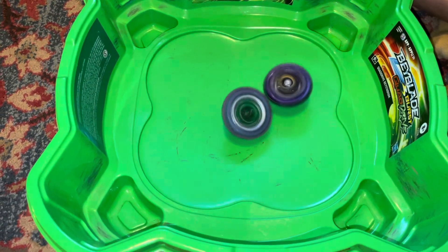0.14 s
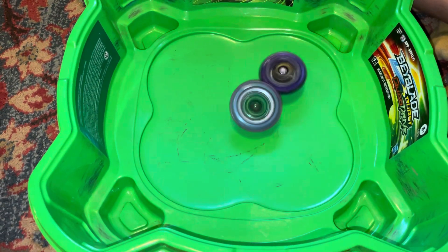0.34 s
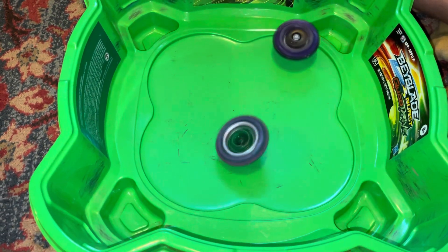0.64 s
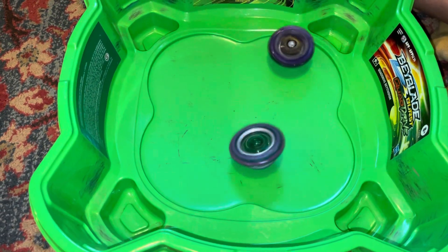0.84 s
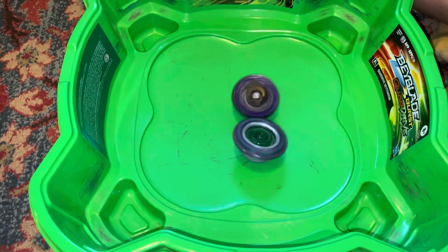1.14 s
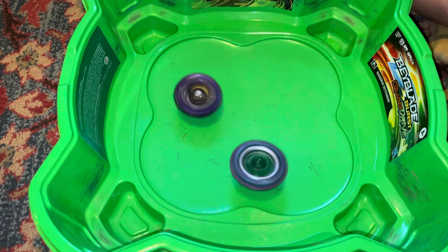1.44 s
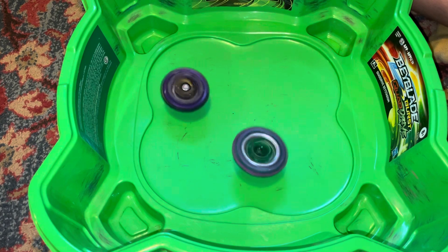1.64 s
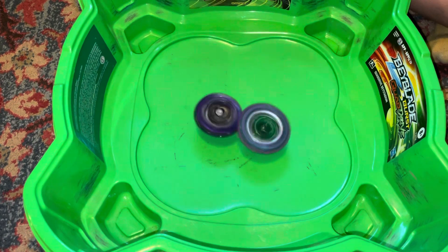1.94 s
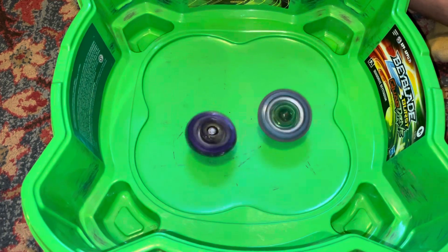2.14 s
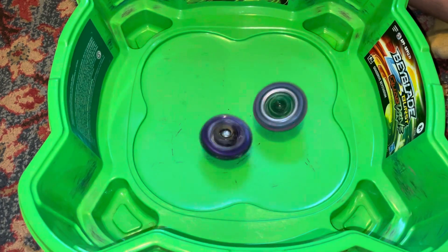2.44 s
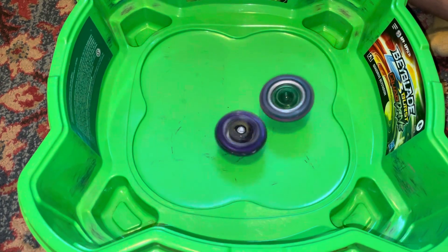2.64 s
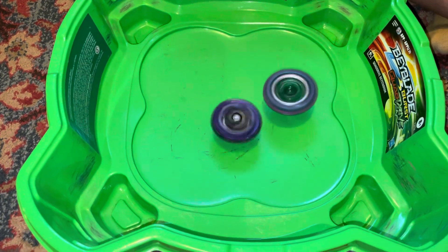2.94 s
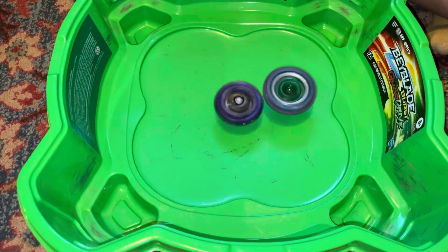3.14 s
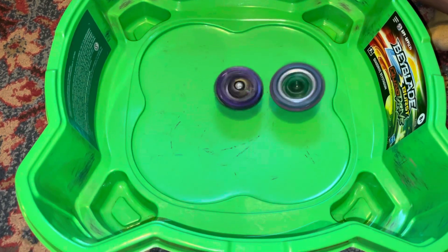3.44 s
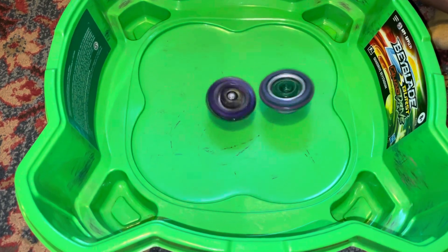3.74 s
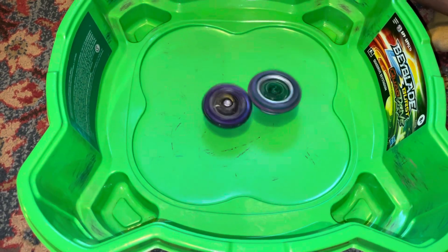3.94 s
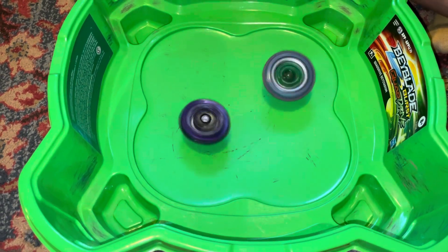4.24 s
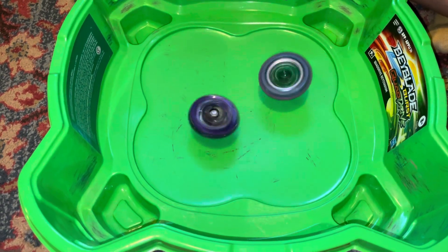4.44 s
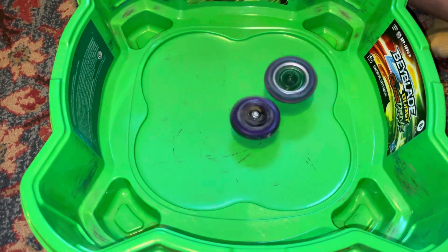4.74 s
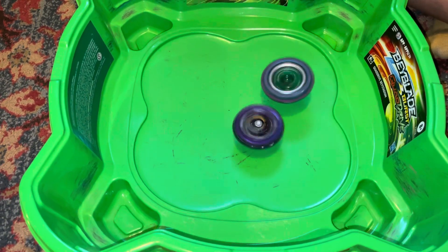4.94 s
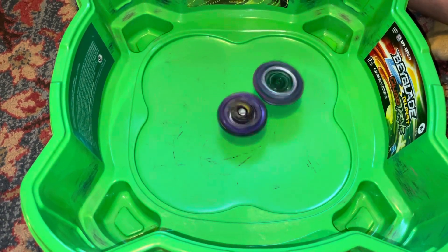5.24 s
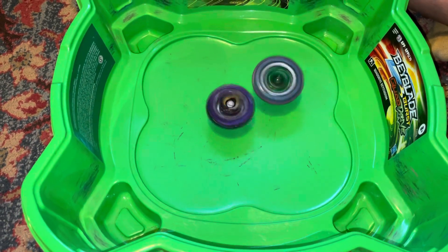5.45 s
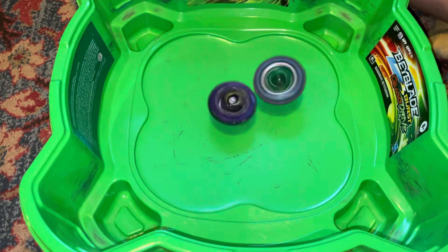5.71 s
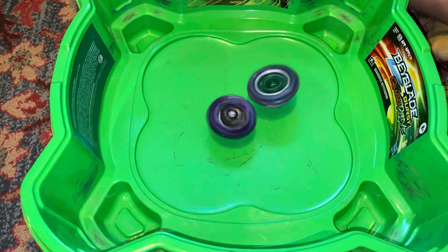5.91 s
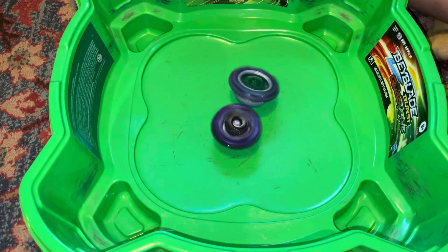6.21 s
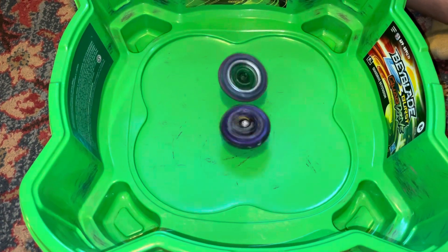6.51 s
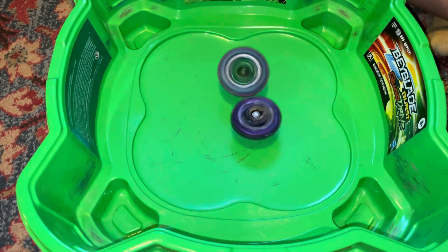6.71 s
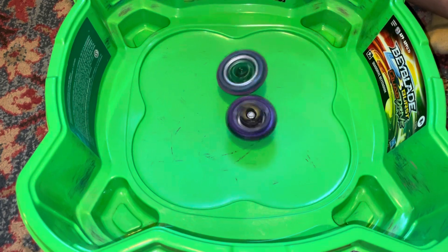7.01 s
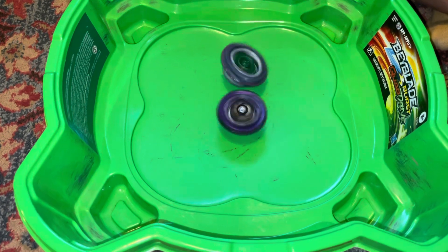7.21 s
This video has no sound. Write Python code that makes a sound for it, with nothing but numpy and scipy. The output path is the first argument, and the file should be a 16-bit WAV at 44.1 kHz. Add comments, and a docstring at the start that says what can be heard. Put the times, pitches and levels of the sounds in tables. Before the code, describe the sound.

Sharp plastic-and-metal clacks burst unevenly as two spinning tops meet, separate and meet again. Between hits, tilted tips patter quickly and roll with a faint rough whirr and rumble. The thin bowl resonates briefly, with soft thuds below. Heard close, in near-centred stereo with short room reflections and a steady low hum; a dense cluster of clashes comes at the end.

```python
"""In a thin plastic arena on a rug, two toy spinning tops with metal rings clash, heard from close above.
Rims grind in short bursts of gritty noise that excite broad body resonances and narrow shell modes.
Tilted tips knock on the floor about once a turn, and rolling tips whirr and rumble as shaped noise.
Some clashes leave a ring singing in throbbing damped partials, and the shell booms.
A faint appliance hum of narrow noise bands fills the room, whose reflections are decaying noise."""
import sys
import numpy as np
from scipy import signal
from scipy.fft import rfft, irfft, next_fast_len
from scipy.io import wavfile
from scipy.ndimage import uniform_filter1d

SR = 44100
rng = np.random.default_rng(int(sys.argv[2]) if len(sys.argv) > 2 else 0)


def wrap_up_sound(samples):
    """Save the sound to the file named by the first command line argument, as 16-bit audio."""
    columns = np.atleast_2d(samples).T
    # keep every value between -1 and 1, then stretch to whole-number steps
    tamed = np.clip(columns, -1, 1)
    steps = np.round(tamed * 32767).astype(np.int16)
    wavfile.write(sys.argv[1], SR, steps)


N = 325084


def from_db(db):
    """Decibel law: amplitude gain of a level in dB."""
    return 10 ** (np.asarray(db) / 20)


def rms_one(x):
    """Normalisation of effective value: x scaled to rms 1."""
    return x / np.sqrt(np.mean(x ** 2) + 1e-20)


def at_hz(points, hz):
    """Logarithmic pitch: the table's second column read on a log-frequency axis."""
    table_hz, value = np.transpose(points)
    return np.interp(np.log(hz + 1), np.log(table_hz), value)


def drift(rate):
    """Random modulation: straight lines between normal deviates, `rate` of them per second."""
    knots = rng.standard_normal(2000)
    return np.interp(np.arange(N) / SR * rate, np.arange(len(knots)), knots)


def coloured(spectrum, shape):
    """Spectral shaping: steady white noise weighted by a spectrum, rms 1."""
    white = rfft(rng.standard_normal(shape))
    weight = from_db(at_hz(spectrum, np.fft.rfftfreq(N, 1 / SR)))
    return rms_one(irfft(white * weight, N))


def resonate(x, hz, width):
    """Damped resonance: a two-pole band-pass with gain 1 on top."""
    r = np.exp(-np.pi * width / SR)
    numerator = [(1 - r * r) / 2, 0, (r * r - 1) / 2]
    denominator = [1, -2 * r * np.cos(2 * np.pi * hz / SR), r * r]
    return signal.lfilter(numerator, denominator, x)


def bursts(times, level_db, fade_ms, rise_ms):
    """Transient contact: a quick rise and an exponential fade of force at each time."""
    out = np.full(N, 1e-12)
    ms = np.arange(SR // 10) * 1000 / SR
    for s, gain, fade in zip(times, from_db(level_db), np.broadcast_to(fade_ms, len(times))):
        i = round(s * SR)
        push = gain * (1 - np.exp(-ms / rise_ms)) * np.exp(-ms / max(fade, .3))
        out[i:i + len(ms)] += push[:N - i]
    return out


def grit(spread_db):
    """Rough contact: noise whose samples differ widely in size, as uneven micro-contacts do."""
    return rms_one(rng.standard_normal(N) * from_db(spread_db * rng.standard_normal(N)))


def struck(modes, times, level_db, scatter_db):
    """Modal excitation: every blow sets each mode ringing with a strength and sign of its own."""
    out = np.zeros(N)
    at = np.round(np.asarray(times) * SR).astype(int)
    chance = rng.standard_normal((len(at), len(modes), 2))
    for k, (hz, mode_db, t60) in enumerate(modes):
        clicks = np.full(N, 1e-18)
        strength = from_db(level_db + mode_db + scatter_db * chance[:, k, 0])
        np.add.at(clicks, at, strength * np.sign(chance[:, k, 1]))
        r, w = from_db(-60 / (t60 * SR)), 2 * np.pi * hz / SR
        out += signal.lfilter([0, np.sin(w)], [1, -2 * r * np.cos(w), r * r], clicks)
    return out


def smear(x, ms):
    """Finite contact time: a soft blow pushes for some ms, which weakens its treble."""
    push = np.hanning(round(ms * SR / 1000))
    return signal.fftconvolve(x, push / push.sum())[:N]


def tones(times, hz, level_db, rise_ms, t60):
    """Free damped vibration: one decaying sinusoid for each blow, swelling over some ms."""
    out, t = np.zeros(N), np.arange(SR // 3) / SR
    shape = (1 - np.exp(-1000 * t / rise_ms)) * from_db(-60 * t / t60)
    for s, pitch, gain in zip(times, hz, from_db(level_db)):
        i = round(s * SR)
        out[i:i + len(t)] += (gain * shape * np.sin(2 * np.pi * pitch * t))[:N - i]
    return out


# appliance hum bands: f/Hz, width/Hz, level/dB
HUM_BANDS = [(85.8, 4.6, -51.5), (121.4, 0.97, -52), (166.8, 5.6, -58.5), (241.8, 4.6, -63.5)]


def hum():
    """Narrow-band noise: sharply filtered noise is heard as wavering low tones of an appliance."""
    return sum(from_db(db) * rms_one(resonate(rng.standard_normal(N), hz, width))
               for hz, width, db in HUM_BANDS)


# modes of the arena's wall and floor: f/Hz, relative level/dB, t60/s
SHELL_MODES = [(393, -13.5, 0.024), (630, -8.5, 0.0086), (702, -1, 0.016), (766.7, -2.5, 0.025),
               (847, -3, 0.019), (918, -3, 0.024), (1077.4, -3, 0.036), (1208.5, -2.5, 0.044),
               (1292, -8.5, 0.0076)]


def shell(force):
    """Forced vibration: a continuous contact force drives the arena's modes."""
    return sum((-1) ** k * from_db(db) * resonate(force, hz, np.log(1000) / np.pi / t60)
               for k, (hz, db, t60) in enumerate(SHELL_MODES))


# broad resonances of the tops' plastic bodies: f/Hz, width/Hz, relative level/dB
BODY_RESONANCES = [(2227, 1030, 0.5), (2736, 587, 4.5), (3953, 510, -2), (4740, 920, 0.5), (6890, 1950, 0),
                   (9680, 1040, -3), (11500, 3200, -9.5), (15500, 1900, -34)]
TREBLE_SHORTENS = 0.057  # contact length falls with this power of the resonance's pitch


def bodies(force, times, level_db, fade_ms, rise_ms, scatter_db):
    """Source and resonator: each contact excites the plastic in another balance; higher is shorter."""
    balance = scatter_db * rng.standard_normal((len(times), len(BODY_RESONANCES)))
    out = np.zeros(N)
    for k, (hz, width, db) in enumerate(BODY_RESONANCES):
        fade = fade_ms * (hz / 5000) ** -TREBLE_SHORTENS
        contact = force * bursts(times, level_db + db + balance[:, k], fade, rise_ms)
        out += (-1) ** k * resonate(contact, hz, width)
    return out


def chatter(level, sparse_db):
    """Random impacts: scattered tiny contacts of loose parts and floor texture in bodies and shell."""
    force = level * grit(sparse_db)
    plastic = sum((-1) ** k * from_db(db) * resonate(force, hz, width)
                  for k, (hz, width, db) in enumerate(BODY_RESONANCES))
    return plastic + from_db(3.5) * shell(force)


# levels of the rolling tips before modulation: t/s, rumble level/dB, whirr level/dB
ROLLING_LEVELS = [(0.0, -43, -44), (0.16, -38.5, -49.5), (0.25, -32.5, -42.5), (0.4, -44, -48),
                  (0.6, -43, -45.5), (1.11, -44.5, -43.5), (1.39, -51, -53), (1.85, -47.5, -55),
                  (2.11, -49, -50), (3.05, -47.5, -53.5), (3.3, -39.5, -50.5), (3.51, -51, -57.5),
                  (4.04, -43.5, -45), (4.35, -54.5, -53), (5.29, -47, -50.5), (6.57, -49, -54.5),
                  (7.1, -53.5, -51), (7.37, -52, -47.5)]
# spectrum of the whirr: f/Hz, relative level per Hz/dB
WHIRR_SPECTRUM = [(110, -28), (180, 7.5), (201, -15.5), (239, -3.5), (361, -4.5), (496, -3.5), (839, -1),
                  (2150, -12), (2360, -10.5), (5000, -23), (8140, -32), (13000, -57), (16000, -80.5)]
# spectrum of the rumble: f/Hz, relative level per Hz/dB
RUMBLE_SPECTRUM = [(21, -44), (35, -6), (86, -7.5), (147, -4.5), (194, -25.5), (260, -24), (340, -80),
                   (570, -120)]


def rolling():
    """Roughness excitation: tips on textured floor give a flickering, grainy whirr and lumpy rumble."""
    s, rumble_db, whirr_db = np.transpose(ROLLING_LEVELS)
    now = np.arange(N) / SR
    whirr_now_db = np.interp(now, s, whirr_db)
    whirr = coloured(WHIRR_SPECTRUM, N) * from_db(whirr_now_db + 2.5 * drift(40.0) + 2 * drift(9.0))
    whirr += chatter(from_db(whirr_now_db - 8.5 + 6 * drift(60)), sparse_db=9.0)
    rumble_now_db = np.interp(now, s, rumble_db) + 3.5 * drift(12)
    return whirr, coloured(RUMBLE_SPECTRUM, N) * from_db(rumble_now_db)


# single knocks, bounces and some lesser clashes, all played as knocks:
# t/s, relative tick level/dB, relative shell level/dB
SINGLE_KNOCKS = [(0.0142, -26.5, -49), (1.6473, -36.5, -42), (1.8974, -25, -54), (2.6601, -32.5, -34.5),
                 (2.831, -29, -32.5), (2.876, -26.5, -62), (3.457, -34, -37), (3.4902, -32.5, -39.5),
                 (3.6279, -34.5, -37.5), (3.676, -29.5, -43), (3.799, -39, -50), (3.91, -15.5, -26),
                 (3.9337, -25, -28), (4.1115, -40, -35), (5.0606, -33.5, -52), (5.83, -34.5, -33.5),
                 (6.2356, -16.5, -26.5), (6.2679, -26, -32), (6.2972, -28, -31.5), (6.3566, -34, -33),
                 (6.436, -35, -40.5), (6.4883, -36.5, -43.5), (6.549, -34, -33.5), (6.868, -40, -42),
                 (5.5419, -47, -41), (5.946, -52, -39), (6.9531, -36.5, -40), (7.2818, -23.5, -24.5),
                 (0.326, -16, -21), (0.397, -35, -39), (2.799, -21, -33), (4.537, -45, -43),
                 (4.649, -34, -28), (4.751, -15.5, -30.5), (5.178, -18, -27), (5.289, -16, -23),
                 (7.227, -19, -29), (7.208, -12, -30), (7.342, -35.5, -35)]
# the shell rocking on the rug: f/Hz, relative level/dB, t60/s
BOOM_MODES = [(62, -8.5, 0.67), (81.2, 1, 0.28), (106.3, -10, 0.22), (147.5, 4, 0.089), (233, 1.5, 0.04),
              (344, 1.5, 0.016)]


def knocks():
    """Soft impact: a longer contact gives a duller tick, and its push on the floor rocks the shell."""
    s, tick_db, shell_db = np.hstack([np.transpose(SINGLE_KNOCKS), wobble_knocks()])
    tick = bodies(grit(1.4), s, tick_db + 7.5, fade_ms=3.47, rise_ms=3.2, scatter_db=2.0)
    tick = signal.sosfilt(signal.butter(1, 5000.0, fs=SR, output="sos"), tick)
    # a loose part in the top answers each knock a moment later with two short pings
    for late, pitch, size in rng.standard_normal((len(s), 2, 3)).transpose(1, 2, 0):
        ping_s, ping_hz = s + .002 + .012 * np.abs(late), 2700 + 110 * pitch
        tick += tones(ping_s, ping_hz, tick_db - 10.5 + 2.5 * size, rise_ms=1, t60=.02)
    # the tip skids on after the knock in a run of tiny contacts
    skid = bursts(s, tick_db - 13.5, fade_ms=14.9, rise_ms=12.0) * from_db(2.94 * drift(220.0))
    tick += chatter(skid, sparse_db=14.0)
    wall = shell(grit(8.8) * bursts(s, shell_db + 22, fade_ms=3.67, rise_ms=0.58))
    wall += smear(struck(SHELL_MODES, s + 0.00154, shell_db - 7.0, scatter_db=2.0), ms=0.36)
    boom = smear(struck(BOOM_MODES, s + 0.0082, shell_db - 10, scatter_db=-1.0), ms=5.23)
    return tick + wall, boom


# metal rings left singing by clashes:
# t/s, ring index, relative level of low partials/dB, relative level of upper partials/dB
SINGING_RINGS = [(0.1, 0, -36, -26), (.383, 0, -21, -17.5), (1.246, 0, -27, -43), (1.959, 0, -26, -25),
                 (2.513, 1, -42, -25), (2.579, 1, -34, -23), (3.054, 0, -25, -48), (3.128, 0, -34, -38),
                 (3.998, 0, -23, -22), (3.997, 1, -26.5, -46), (4.636, 1, -35, -30), (5.264, 1, -34, -35),
                 (5.347, 0, -30.5, -55), (6.211, 1, -37, -34), (7.058, 0, -30, -42), (7.246, 0, -26, -38),
                 (7.247, 1, -30, -31.5), (1.96, 1, -30, -51), (5.348, 1, -36, -41)]
# partials of each metal ring: f/Hz, relative level/dB, t60/s, lobes passing per turn
RING_MODES = [
    [(4920, -6, .28, 4), (10110, 0, .1, 4), (11945, -10, .3, 4), (12900, -16, .13, 4)],
    [(4605, -2, .33, 2), (4690, -7, .2, 2), (10210, 0, .12, 4)],
]
# rotation of the tops, also pacing the wobble knocks: t/s, rotation f/Hz
SPIN_RATE = [(0, 29), (2.3, 25), (4.3, 22), (7.4, 17)]


def rings():
    """Rotating mode shapes: lobes of struck partials turn with the top, so they throb and break up."""
    s, ring, low_db, upper_db = np.transpose(SINGING_RINGS)
    turns = np.cumsum(np.interp(np.arange(N) / SR, *np.transpose(SPIN_RATE))) / SR
    out = np.zeros(N)
    for k, partials in enumerate(RING_MODES):
        hit = np.round(ring) == k
        for hz, db, t60, lobes in partials:
            lobe = 1 + .45 * np.cos(2 * np.pi * (lobes * turns + rng.random()))
            throb = lobe * (.55 + .6 * drift(220))
            level_db = db + (upper_db if hz > 6000 else low_db)[hit]
            out += throb * tones(s[hit], np.full(hit.sum(), hz), level_db, rise_ms=2.5, t60=t60)
    return out


# rim on rim; the tones shift with the place of the blow: t/s, relative crack level/dB,
# relative shell level/dB, relative boom level/dB, basic grind fade/ms, shell tone f/Hz, boom tone f/Hz
RIM_CLASHES = [(0.101, -7, -23, -55, 2.16, 1146, 143), (0.314, -15.5, -20, -29.5, 8.4, 1040, 59.4),
               (0.3399, -8, -17, -49, 2, 808, 62), (0.3809, -7.5, -20.5, -25, 4.7, 787, 77),
               (1.1329, -18.5, -15, -53, 7.6, 1060, 146), (1.1388, -3, -22.5, -34.5, 2.2, 1036, 144),
               (1.245, -4.5, -18, -30, 3.1, 1015, 74), (1.936, -15, -24.5, -29, 6.7, 670, 88),
               (1.9587, -1, -11, -23.5, 1.67, 1000, 85), (2.0087, -20, -20, -30, 1.4, 990, 95.5),
               (2.51, -9, -17.5, -35, 4.2, 863, 80.4), (2.5778, -8, -15.5, -41, 3.4, 837, 80.5),
               (2.7722, -8, -17, -36.5, 3.4, 895, 81.4), (3.0469, -8, -25.5, -59, 1.06, 980, 129),
               (3.052, -9.5, -14, -33, 2, 978, 135), (3.1185, -10.5, -22, -25, 1.14, 1090, 100),
               (3.1263, -18, -22, -25.5, 5.9, 1020, 105), (3.1445, -17, -21.5, -25.5, 1.2, 1060, 101),
               (3.1989, -11, -17.5, -28.5, 3.2, 1020, 108.5), (3.3665, -10, -19.5, -38, 2.37, 1075, 76.6),
               (3.8556, -18.5, -27, -37, 2.2, 1470, 143), (3.877, -13, -16, -28.5, 5.1, 1074, 74),
               (3.965, -13, -28, -41, 5.2, 1350, 92), (3.9859, -4, -13.5, -26, 3.3, 1102, 79),
               (3.998, -11.5, -41, -25, 4.2, 810, 78.7), (4.622, -5.5, -15, -33, 1.9, 1120, 76.6),
               (4.6332, -9.5, -28, -29.5, 3.8, 1093, 75.4), (4.731, -4.5, -14, -30, 1.77, 1050, 72.4),
               (5.1666, -7.5, -19.5, -31, 2, 692, 119), (5.242, -19.5, -22, -35.5, 8.2, 1260, 135),
               (5.2631, -4, -18.5, -32.5, 1.94, 1190, 137), (5.3283, -15, -26, -26.5, 4.6, 630, 73.4),
               (5.345, -16, -19, -47, 4.2, 613, 81), (5.5933, -28.5, -25.5, -64, 4.2, 1100, 78),
               (5.6069, -13.5, -25.5, -40, 2.74, 1137, 82), (5.683, -19.5, -22.5, -48, 5, 706, 71),
               (6.2114, -11, -19.5, -33, 3.9, 1010, 145), (6.6132, -16, -18, -40, 3.4, 1050, 83),
               (6.6941, -20, -18.5, -60, 3, 947, 127), (6.7808, -9, -17, -29.5, 3.64, 1047, 75),
               (7.056, -15.5, -19.5, -31, 8.4, 755, 171), (7.1052, -20, -21.5, -33.5, 3.7, 596, 164),
               (7.1628, -19.5, -23, -32, 7.6, 1190, 74), (7.19, -14, -17, -27, 8.2, 1175, 74.5),
               (7.217, -5, -20, -39, 3.2, 847, 127), (7.2434, -11, -17.5, -25, 2.5, 704, 141.5)]


def clashes():
    """Coupled resonators: gritty bursts crack in the bodies, drive the shell and boom a little late."""
    s, crack_db, shell_db, boom_db, grind_ms, shell_hz, boom_hz = np.transpose(RIM_CLASHES)
    crack = bodies(grit(5.0), s, crack_db + 6.0, grind_ms, rise_ms=0.8, scatter_db=1.5)
    wall = shell(grit(2.6) * bursts(s, shell_db + 19.0, grind_ms + 3.7, rise_ms=0.77))
    # one tone of the shell stands out
    wall += tones(s, shell_hz, shell_db - 0.5, rise_ms=3.1, t60=0.044)
    rattle = bursts(s, crack_db - 23, fade_ms=29.6, rise_ms=3.7) * from_db(5.1 * drift(150.0))
    crack += chatter(rattle, sparse_db=5.5)
    boom = smear(struck(BOOM_MODES, s + 0.01038, boom_db - 6.5, scatter_db=4.0), ms=1.8)
    boom += tones(s + 0.0037, boom_hz, boom_db + 6.0, rise_ms=23.0, t60=0.15)
    return crack + wall + rings(), boom


# spells of wobbling, before jitter: first knock t/s, last knock t/s
WOBBLE_SPELLS = [(0.1563, 0.2904), (0.4339, 0.5756), (0.6156, 0.8624), (0.908, 1.1173), (2.0563, 2.4915),
                 (4.1667, 4.396)]
# how hard a tilted top knocks: t/s, relative tick level/dB, relative shell level/dB
TILT_LEVELS = [(0.15, -24.5, -25), (0.29, -16.5, -29.5), (0.43, -17, -28.5), (0.5, -21.5, -23),
               (0.63, -18.5, -19), (0.82, -21.5, -26.5), (0.9, -30, -32), (1.12, -29, -36),
               (2.05, -28.5, -36), (2.2, -40.5, -39), (2.45, -34.5, -38), (4.4, -38.5, -36.5)]
KNOCK_JITTER_S, KNOCK_SCATTER_DB = .001, 2  # standard deviations


def wobble_knocks():
    """Periodic impact: a tilted top knocks about once a turn, a little uneven in time and strength."""
    spells = []
    for first, last in WOBBLE_SPELLS:
        turns = round((last - first) * np.interp(first, *np.transpose(SPIN_RATE)))
        spells.append(np.linspace(first, last, turns + 1))
    s = np.concatenate(spells)
    late, sharp, heavy = rng.standard_normal((len(s), 3)).T
    when, tick_db, shell_db = np.transpose(TILT_LEVELS)
    return [s + KNOCK_JITTER_S * late,
            np.interp(s, when, tick_db) + KNOCK_SCATTER_DB * sharp,
            np.interp(s, when, shell_db) + KNOCK_SCATTER_DB * heavy]


# reverberation time: f/Hz, t60/s
REVERB_TIME = [(300, 0.35), (1000, 0.13), (3000, 0.15), (7000, 0.042), (13000, 0.055)]
ROOM_DB = -11  # reflections relative to the near sound


def room(x):
    """Diffuse reverberation: dense reflections off bowl and room, partly unlike at each ear."""
    t = np.arange(SR // 3) / SR
    echo = np.zeros((2, len(t)))
    for low in 250 * 2. ** np.arange(6):  # each octave dies at its own rate
        octave = signal.butter(2, [low, 2 * low], "band", fs=SR, output="sos")
        band = signal.sosfilt(octave, rng.standard_normal(echo.shape))
        echo += band * from_db(-60 * t / at_hz(REVERB_TIME, low * np.sqrt(2)))
    echo *= 1 - np.exp(-t / 0.003)  # the first reflections need a moment to arrive
    common = 0.68  # share heard alike at both ports
    echo = common * echo[0] + np.sqrt(1 - common ** 2) * echo[1] * [[1], [-1]]
    unit_energy = echo / np.sqrt(np.sum(echo ** 2) / 2)
    return signal.fftconvolve(x[None], unit_energy, axes=1)[:, :N]


def scene():
    """Superposition: all sources add near the middle, with the room around them."""
    (clash, boom), (knock, thud), (whirr, rumble) = clashes(), knocks(), rolling()
    near = clash + knock + whirr
    low = boom + thud + rumble + hum()
    # the bass differs a little between the ports, in step with its own running level
    low_level = np.sqrt(uniform_filter1d(low ** 2, size=2000) + 1e-18)
    low_side = from_db(-17.5) * coloured(RUMBLE_SPECTRUM, N) * low_level
    low = low + low_side * [[1], [-1]]
    # the microphone picks up little deep bass
    low = signal.sosfilt(signal.butter(4, 48.0, "high", fs=SR, output="sos"), low)
    return near + from_db(ROOM_DB) * room(near) + low


# phase between two microphone ports: f/Hz, lead of the left/rad
PORT_LEAD = [(0, 0), (1460, -.1), (2410, 1.2), (3360, .1), (5080, .8), (6290, -.2), (7670, -2.9),
             (9470, -3.8), (10600, -6.0), (12100, -6.4), (14000, -9.3), (16700, -9.5)]
# level between the ports: f/Hz, left minus right level/dB
PORT_BALANCE = [(200, .5), (1290, 0), (2380, 2.5), (4400, 1.5), (8120, 0)]
CUTOFF_HZ = 17200


def record(dry):
    """Interchannel difference: ports in one case differ in phase and level; peaks round, top is cut."""
    size = next_fast_len(N + 1000)
    hz = np.fft.rfftfreq(size, 1 / SR)
    lead = np.interp(hz, *np.transpose(PORT_LEAD))
    half = from_db(at_hz(PORT_BALANCE, hz) / 2) * np.exp(.5j * lead)  # half the difference for each port
    ports = irfft(rfft(dry, size) * [half, 1 / half], size)[:, :N]
    return signal.sosfilt(signal.cheby2(12, 70, CUTOFF_HZ, fs=SR, output="sos"), np.tanh(ports))


dry = scene()
out = record(dry)
wrap_up_sound(out)
```